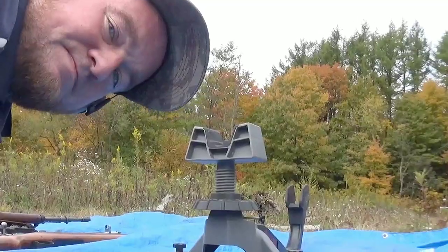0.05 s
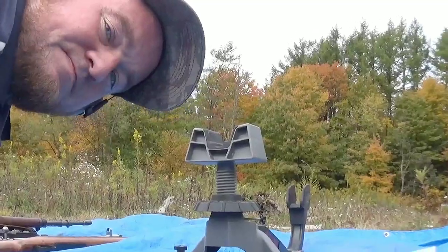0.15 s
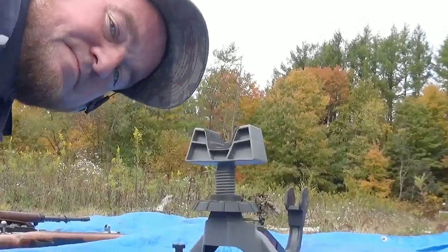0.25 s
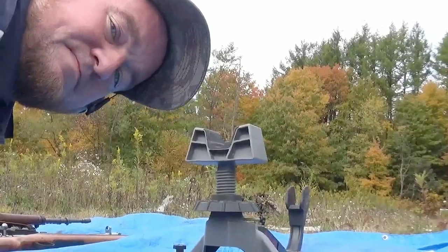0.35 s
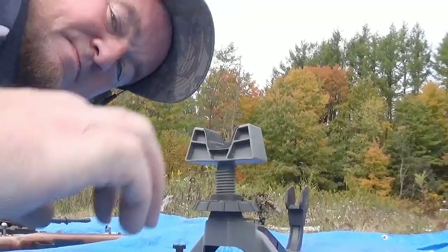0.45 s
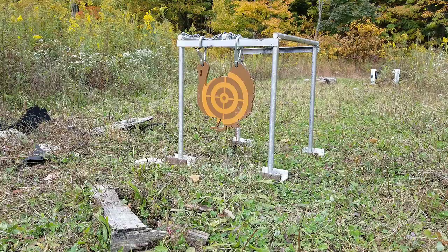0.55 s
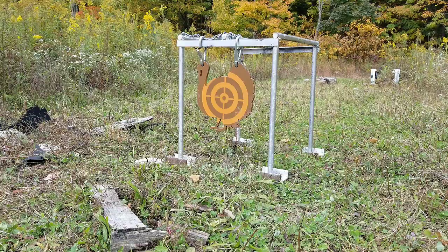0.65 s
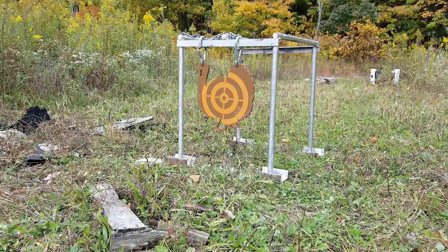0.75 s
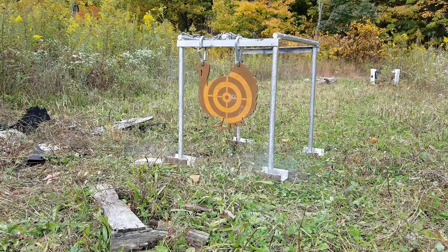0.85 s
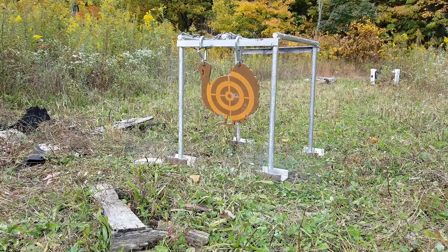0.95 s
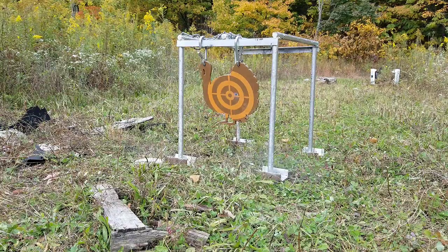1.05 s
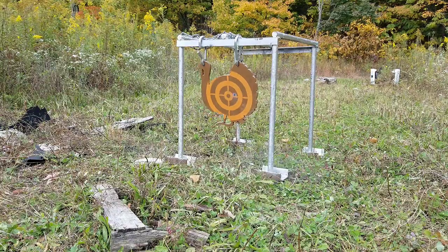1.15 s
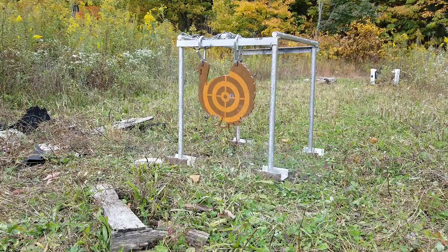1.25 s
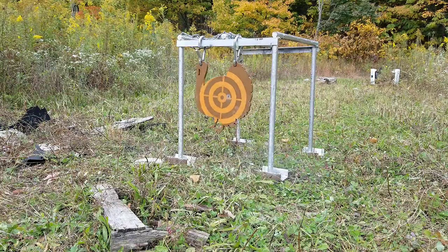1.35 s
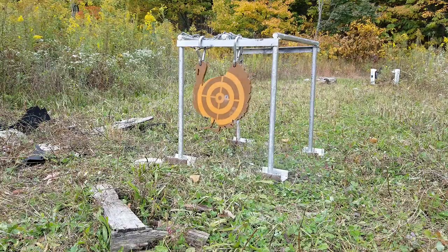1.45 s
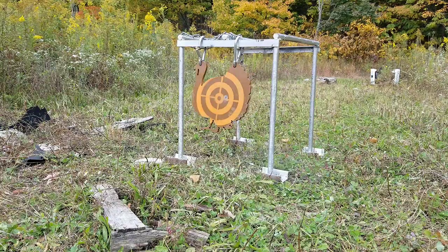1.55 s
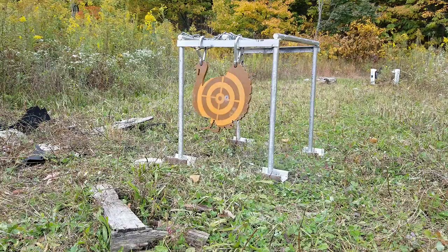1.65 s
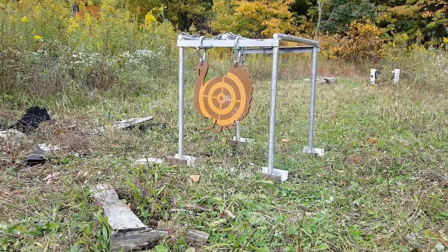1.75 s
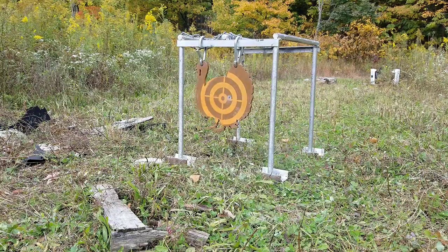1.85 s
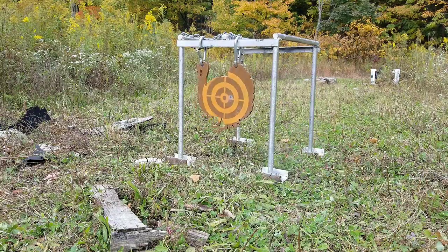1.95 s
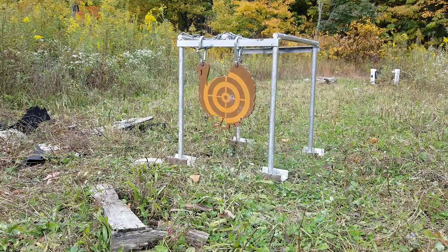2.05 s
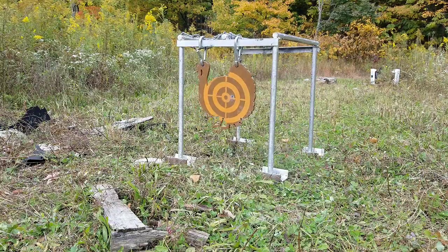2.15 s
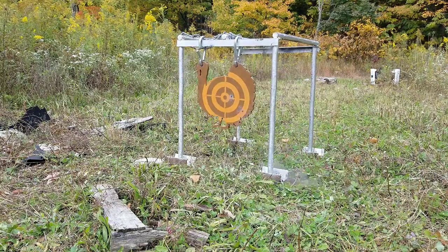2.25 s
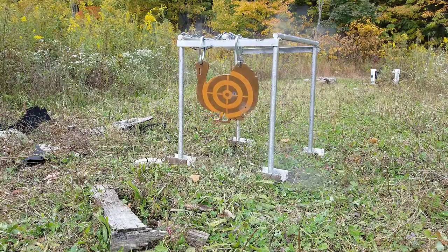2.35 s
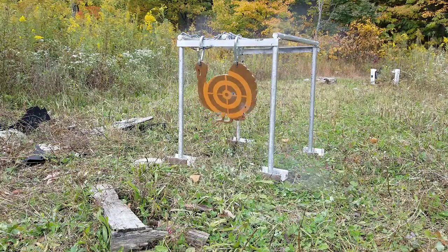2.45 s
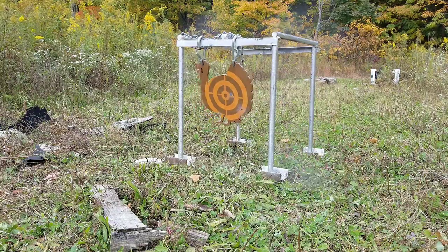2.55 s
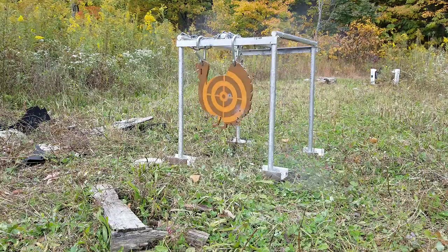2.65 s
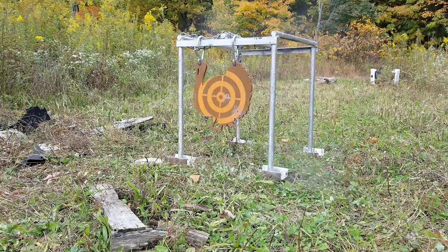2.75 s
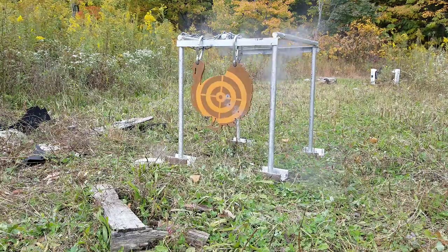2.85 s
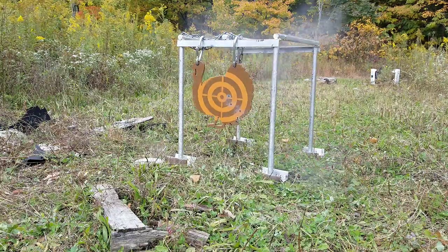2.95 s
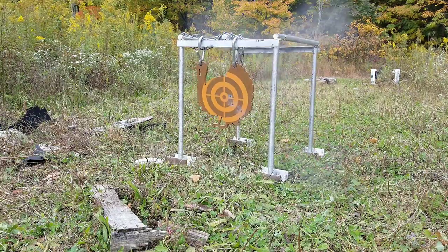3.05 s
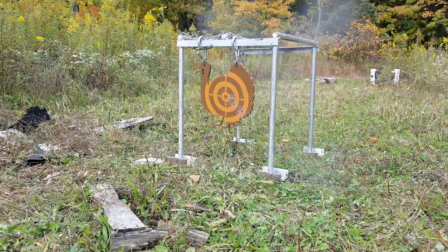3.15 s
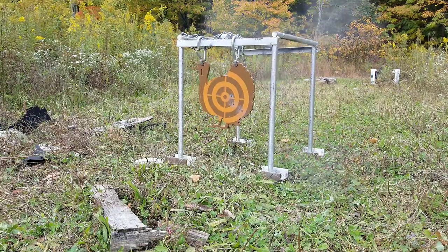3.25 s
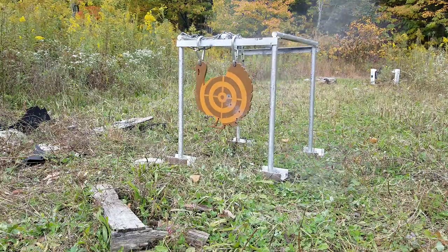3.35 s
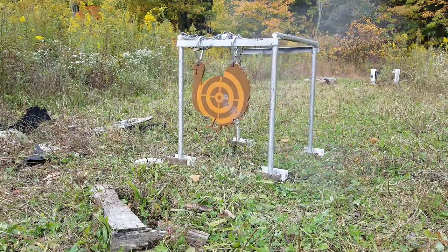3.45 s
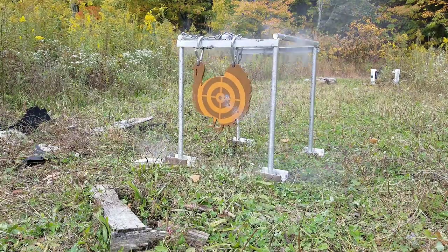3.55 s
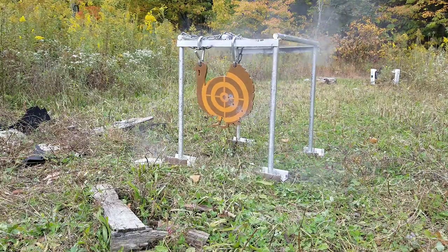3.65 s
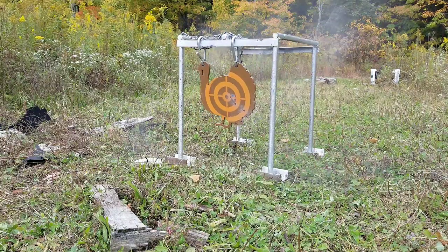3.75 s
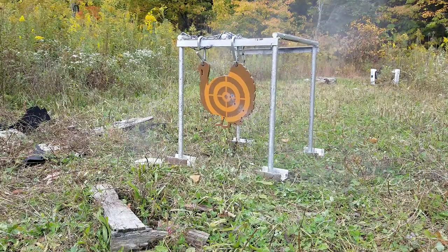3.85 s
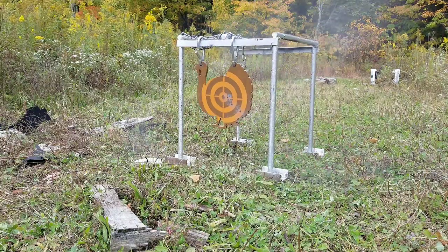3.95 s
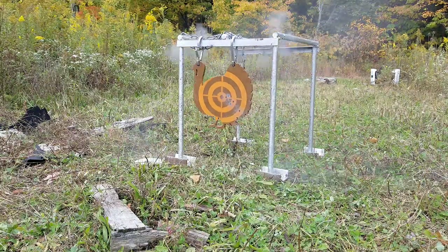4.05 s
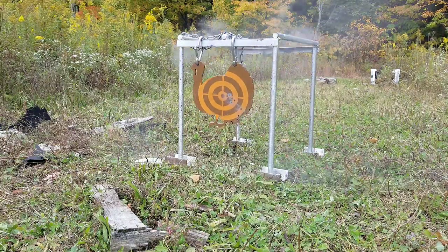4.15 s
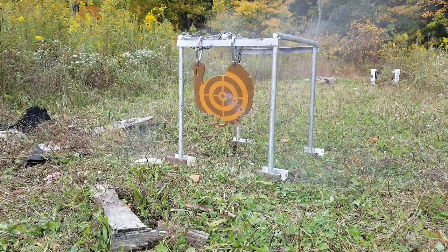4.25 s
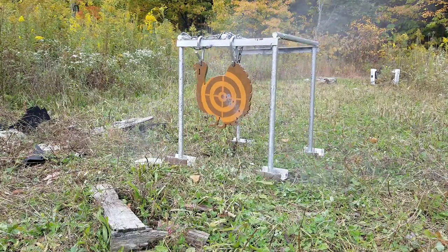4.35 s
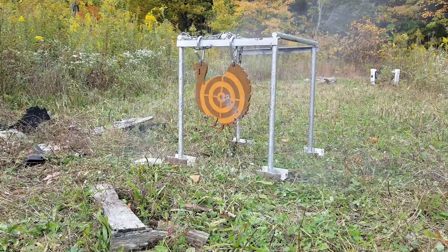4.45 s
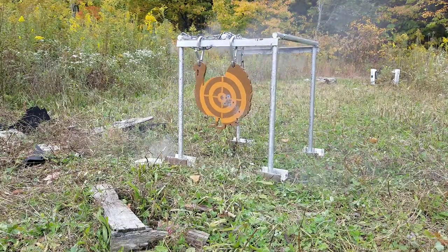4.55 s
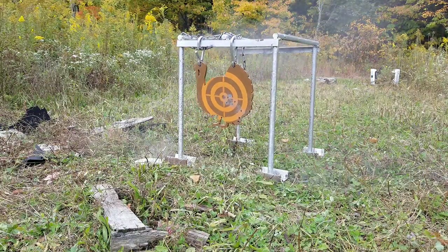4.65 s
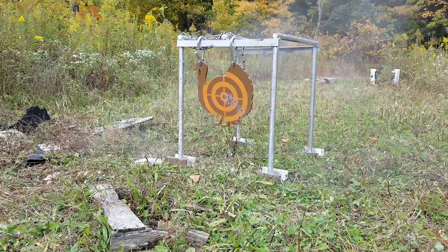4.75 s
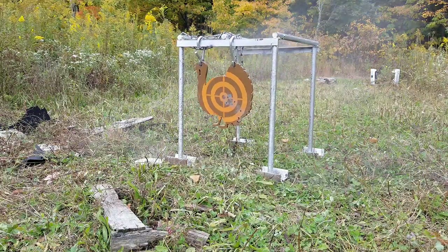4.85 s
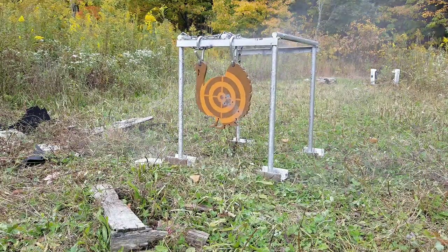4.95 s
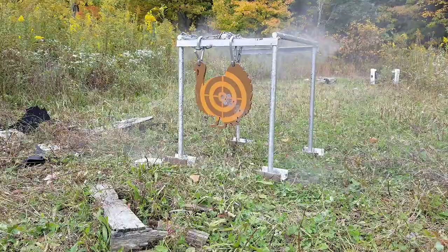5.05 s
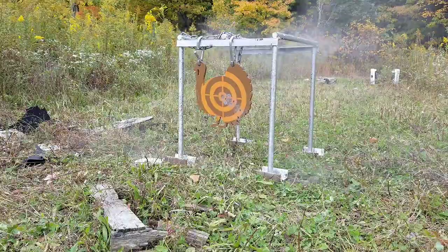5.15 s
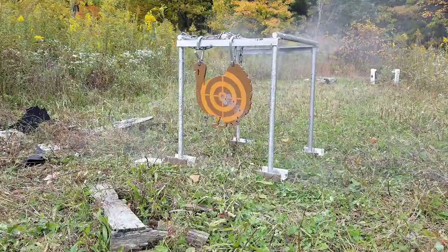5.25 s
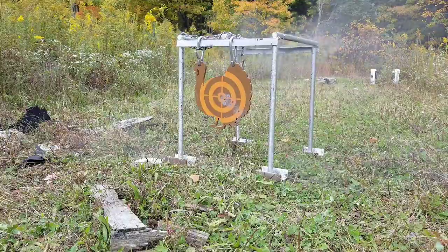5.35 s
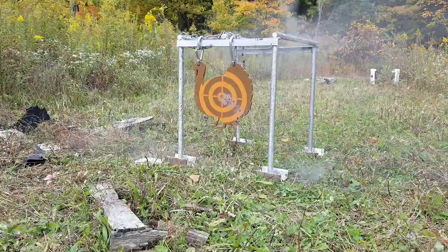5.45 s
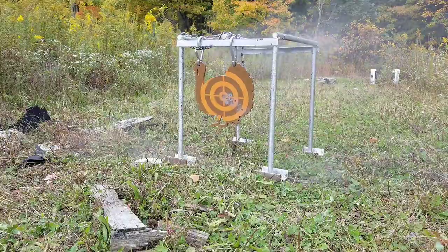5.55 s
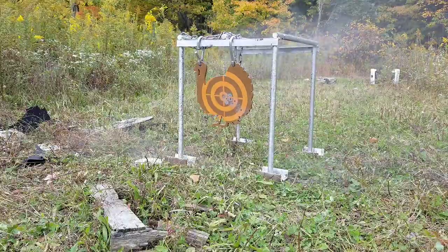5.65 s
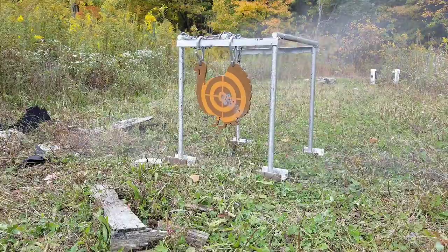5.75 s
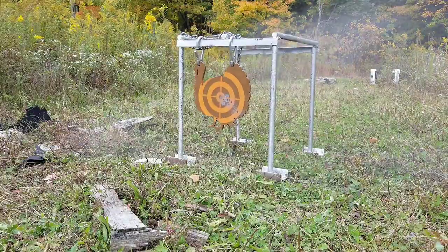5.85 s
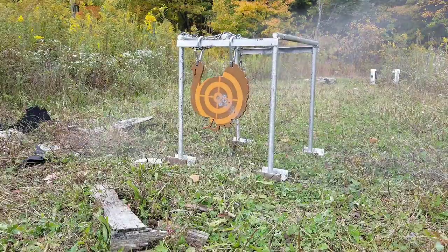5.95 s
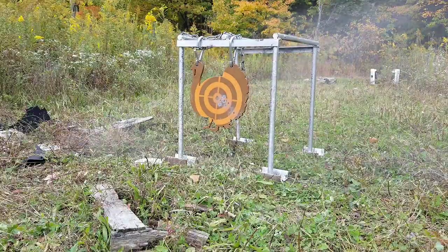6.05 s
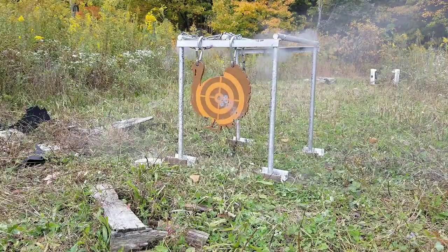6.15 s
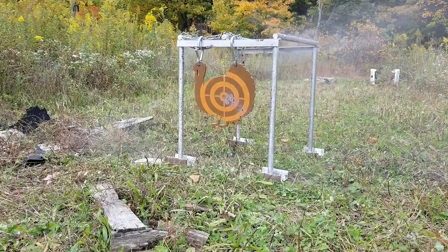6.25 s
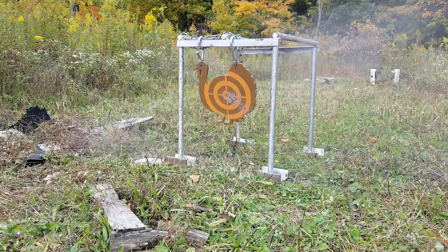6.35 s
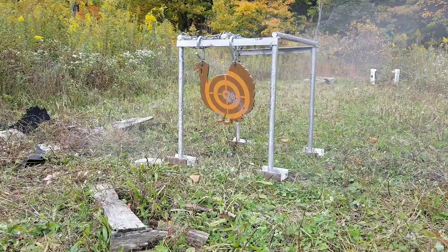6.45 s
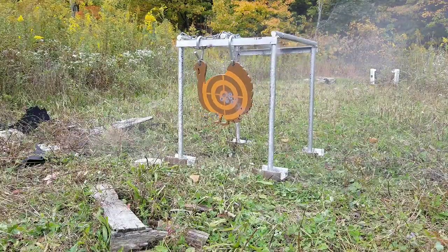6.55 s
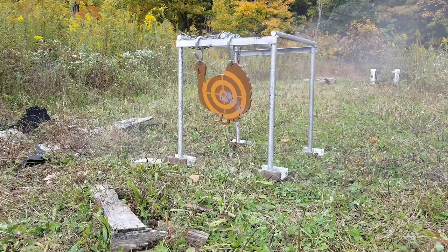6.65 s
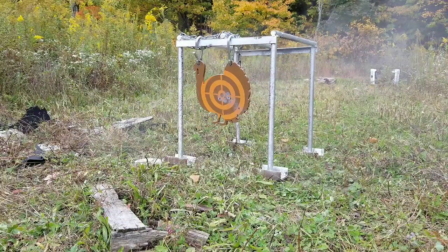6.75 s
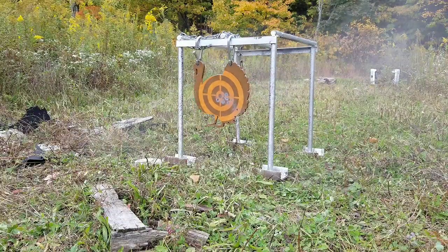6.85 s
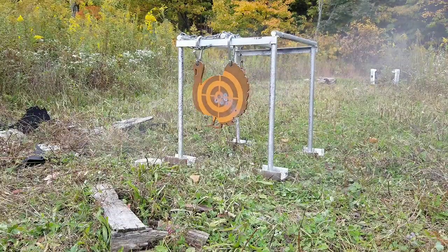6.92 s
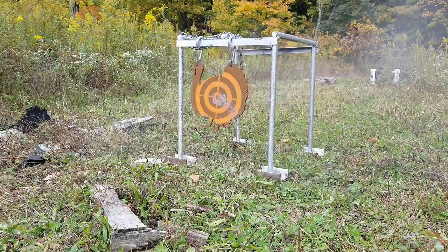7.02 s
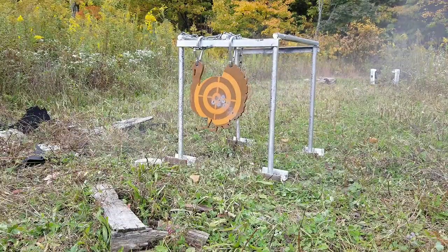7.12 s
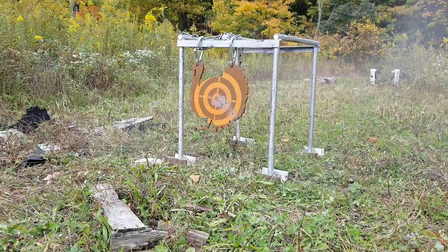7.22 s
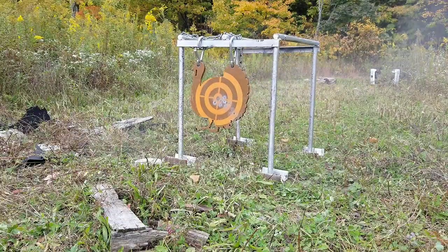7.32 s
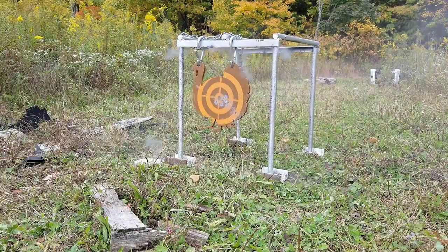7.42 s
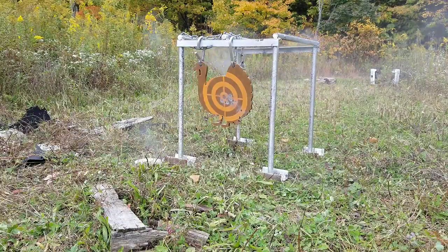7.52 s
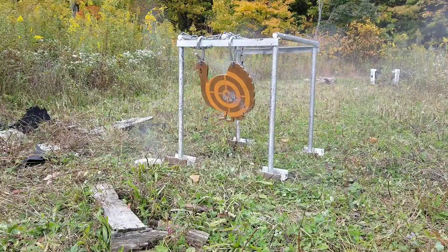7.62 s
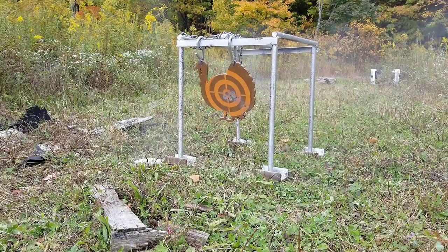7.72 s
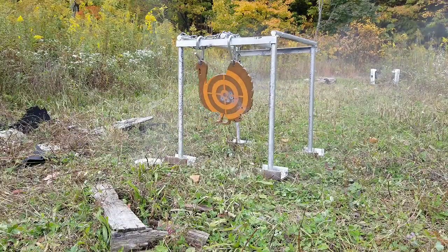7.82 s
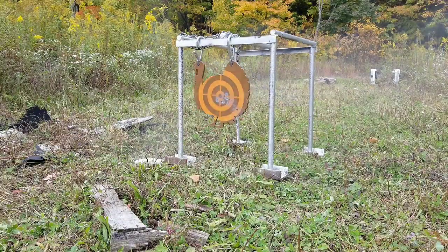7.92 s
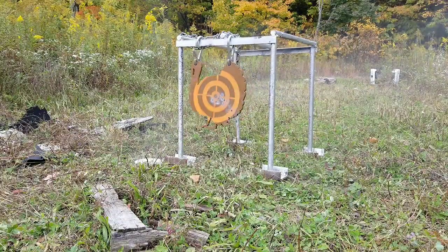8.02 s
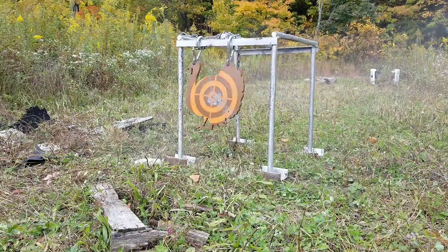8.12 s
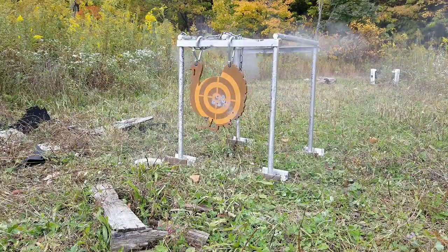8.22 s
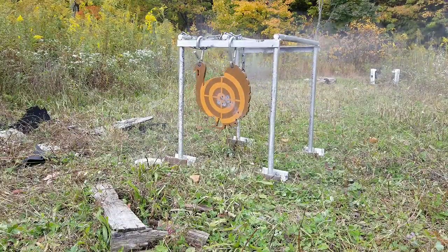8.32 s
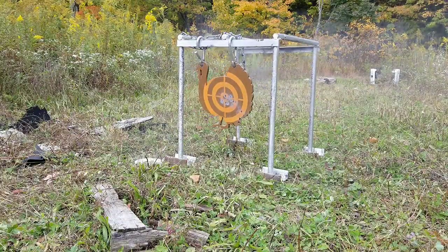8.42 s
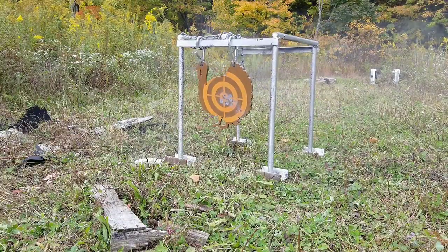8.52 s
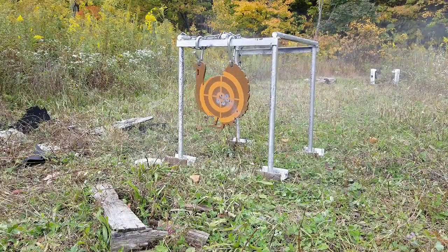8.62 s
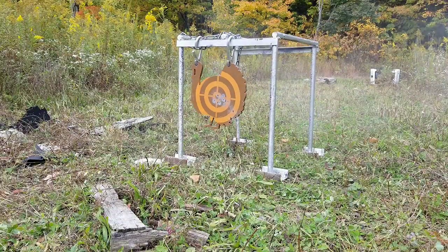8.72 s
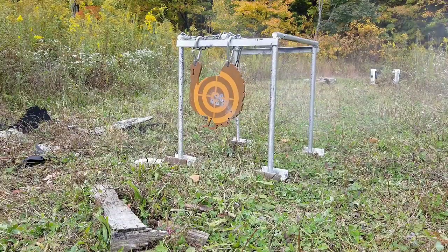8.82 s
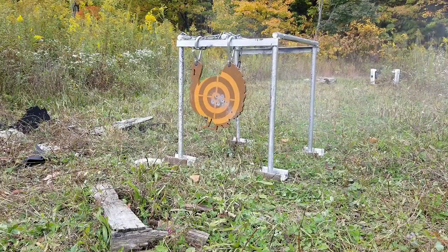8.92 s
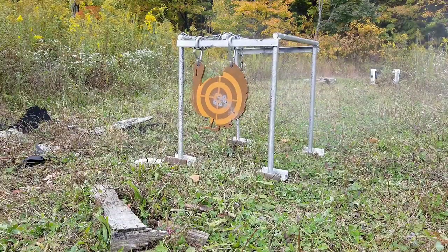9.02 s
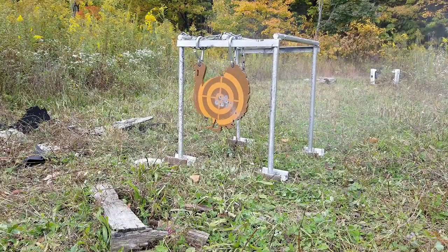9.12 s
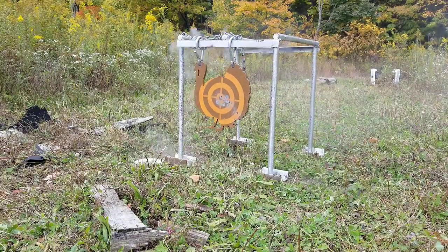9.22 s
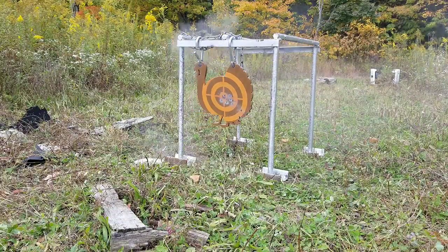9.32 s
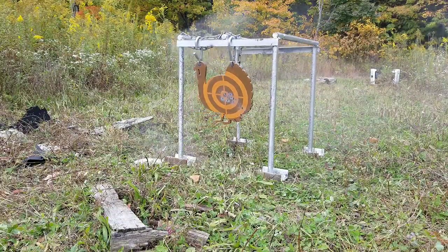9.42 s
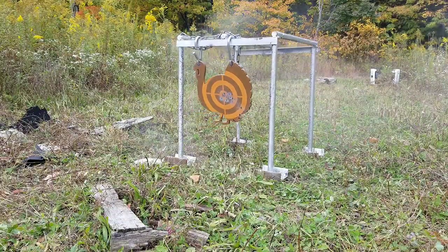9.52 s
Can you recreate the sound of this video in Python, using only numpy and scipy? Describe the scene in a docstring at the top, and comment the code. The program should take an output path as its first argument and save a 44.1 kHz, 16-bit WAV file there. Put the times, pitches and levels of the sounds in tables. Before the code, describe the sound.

Dull close handling clicks end abruptly; crickets chirp in open air for a moment. Then thirteen bullet strikes hit a hanging steel target close to a small stereo camera microphone, each a clipped crack and thud with spraying lead hiss and a bright, dissonant metallic clang that breaks off quickly. A diffuse gunshot report follows every blow and rumbles along the tree line, filling the gaps between hits.

```python
"""First a rifle rest is handled close to one camera: noise bursts round broad resonances click and scrape over air noise.
After a cut, a second camera stands in a meadow: gliding sines chirp as crickets over far insects and wind, both noise.
The gain control ducks these under the first shot. Each bullet cracks past, a shock offset pinning one port; the blow
thumps and splashes in fading noise, and decaying sine modes ring a hanging steel plate and hum in its frame.
The far muzzle report follows each blow, lumpy noise that rolls off the tree line."""
import sys
import numpy as np
from scipy import signal
from scipy.fft import rfft, irfft, next_fast_len
from scipy.io import wavfile
from scipy.ndimage import uniform_filter1d, map_coordinates

SR = 44100
rng = np.random.default_rng(int(sys.argv[2]) if len(sys.argv) > 2 else 0)


def store_pcm(level_fs):
    """Save levels as 16-bit WAV."""
    pcm = np.round(np.clip(level_fs, -1, 1) * 32767).astype(np.int16)
    wavfile.write(sys.argv[1], SR, np.atleast_2d(pcm).T)


N = 422478

# the cut between the cameras: first one ends t/s, second one begins t/s
CUT = (.5315, .557)
# natural frequencies of the steel plate, one for each row of PLATE: f/Hz
PLATE_HZ = [1860, 2431, 3639, 4328, 4710, 5165, 5706, 5997, 6172, 6589, 6756, 7076, 7714, 8293, 8425, 8608,
            9044, 9402, 9615, 10104, 10592, 11108, 11421, 12371, 13143, 13251, 14123, 14328, 14594, 14904,
            15305]
# plate modes: clang level/dB, clang t60/s, lasting ring level/dB, its t60/s before a random spread,
# slant of the wave pattern/rad, phase across/rad, phase upward/rad
PLATE = [(6.5, 0.22, -37, 1.3, 0.2, -1, 0.45), (12, 0.2, -21.5, 0.44, 0.25, -0.98, 0.42),
         (3.5, 0.4, -42.5, 1.6, 0.84, -0.58, 0.29), (18, 0.19, -41.5, 0.67, 0.9, 1, 0.29),
         (12.5, 0.26, -42.5, 0.66, 1, 1.4, -0.79), (9.5, 0.22, -35.5, 0.39, 0.09, -1.51, 0.88),
         (1.5, 0.21, -50, 0.94, 0.17, -0.81, -0.13), (4, 0.22, -39.5, 0.8, 1.7, -0.82, -0.51),
         (16, 0.28, -37, 0.49, 1.486, -0.44, 0.53), (13.5, 0.23, -37, 0.29, 0.52, -0.73, 1.5),
         (10, 0.19, -48.0, 1.4, 0.18, -0.0085, -0.78), (21.5, 0.21, -35.5, 0.83, 0.15, -1.1, 1.16),
         (-3, 0.23, -37.5, 0.62, 0.65, -1.04, 0.08), (2.5, 0.13, -36.5, 0.53, 0.86, -1.1, 0.088),
         (2.3, 0.21, -47, 0.51, 0.57, -1.1, 0.012), (11.5, 0.26, -31, 0.45, -0.03, 1.37, -1.4),
         (6, 0.043, -17.5, 0.32, 0.78, -1.8, -0.67), (18, 0.07, -25.5, 0.35, 0.05, 1, -1.41),
         (-1.2, 0.23, -48.5, 0.71, 1.11, -1.2, -1.55), (-3.1, 0.26, -56, 0.73, 1.01, 0.32, 0.9),
         (12, 0.2, -35.5, 0.72, 0.61, -0.14, 0.018), (4, 0.21, -32, 0.16, 0.68, -1.2, -1.3),
         (-5, 0.07, -0.65, 0.36, 1.21, -0.67, 0.72), (14.5, 0.19, -23.5, 0.41, 1.02, -0.63, 1.1),
         (1, 0.21, -29, 0.39, 0.81, 0.44, -0.84), (4, 0.16, -10.5, 0.46, 0.85, 0.51, -0.88),
         (17, 0.13, -29, 0.42, 0.99, 0.32, 0.98), (12, 0.077, 8, 0.25, 0.8, -1.4, -0.18),
         (13.5, 0.067, 11.5, 0.17, 0.6, -0.32, 1.19), (1.5, 0.16, 6.5, 0.27, 0.79, 0.43, -0.64),
         (6, 0.44, -10, 0.38, 0.96, 0.4, 0.36)]
LEAD_S, PIN_S = .0015, .0073  # crack to shock, and how long the shock pins the port


def amp(db):
    """Level as amplitude ratio: 20 dB for each factor of ten."""
    return 10 ** (np.asarray(db) / 20)


def unit(x):
    """Normalization to a root mean square of 1."""
    return x / np.sqrt(np.mean(x ** 2) + 1e-20)


def along(points, hz, axis=1):
    """Interpolation of one table column on a logarithmic frequency axis."""
    columns = np.transpose(points)
    return np.interp(np.log(hz + 1), np.log(columns[0] + 1), columns[axis])


def filtered(x, response):
    """Linear filtering: the spectrum is multiplied by a response of frequency."""
    m = next_fast_len(x.shape[-1] + SR // 4)
    spectrum = rfft(x, m) * response(np.fft.rfftfreq(m, 1 / SR))
    return irfft(spectrum, m)[..., :x.shape[-1]]


def noise(spectrum, alike, size=N):
    """Partial coherence: stereo noise of rms 1 whose channels correlate by alike."""
    a, b = filtered(rng.standard_normal((2, size)), lambda hz: amp(along(spectrum, hz)))
    turn = np.arccos(np.clip(alike, 0, 1)) / 2
    left = np.cos(turn) * a + np.sin(turn) * b
    right = np.cos(turn) * a - np.sin(turn) * b
    return unit(np.array([left, right]))


def dying(table, alike, seconds, longest=np.inf, patchy_db=0):
    """Frequency-dependent decay: noise of rms 1 in which each band fades at its own rate, in patches."""
    hz, t, z = signal.stft(noise(table, alike, size=round(seconds * SR)), SR, nperseg=256)
    t60 = np.minimum(along(table, hz, axis=2), longest)
    patches = uniform_filter1d(rng.standard_normal(z.shape[1:]), size=5, axis=0)
    patches = uniform_filter1d(patches, size=9, axis=1)
    decay_db = patchy_db * unit(patches) - 60 * t / t60[:, None]
    return signal.istft(z * amp(decay_db), SR, nperseg=256)[1]


def add(track, s, sound):
    """Superposition: a sound is mixed into the track at s seconds."""
    part = track[:, round(s * SR):][:, :sound.shape[1]]
    part += sound[:, :part.shape[1]]


def held_db(x, release):
    """Peak detection: a level that jumps up at once and falls by release dB a second."""
    fall = release * np.arange(N) / SR
    return np.maximum.accumulate(20 * np.log10(np.abs(x) + 1e-9) + fall, axis=-1) - fall


def handling():
    """Impact and friction: hard parts excite broad resonances, heard by a duller camera."""
    # air round the first camera: f/Hz, relative level per Hz/dB
    first_air = [(35, -41), (60, -7.5), (305, 2), (565, -1), (897, -2), (1090, -4.5), (3280, -4.5),
                 (5820, -6.5), (7250, 4), (10800, -19.5), (11500, -39.5), (15000, -69), (22000, -120)]
    # clicks and scrapes: t/s, level/dB before a common trim, f/Hz, t60/s
    contacts = [(0.053, -23, 2930, 0.025), (0.0731, -13, 1358, 0.027), (.107, -16.5, 1264, 0.015),
                (0.135, -25.5, 1470, 0.011), (.212, -18, 1988, 0.1), (0.2209, -10, 1355, 0.013),
                (0.225, -13, 5060, 0.031), (0.245, -20, 2330, 0.12), (.264, -9, 2380, .018),
                (0.294, -25, 7900, 0.0045), (0.308, -21, 3990, 0.1), (0.324, -17, 950, 0.033),
                (0.333, -2, 8600, 0.021), (0.3368, -10, 1330, 0.04), (.36, -23.5, 946, .04),
                (.405, -25.5, 3410, 0.12), (0.426, -24.5, 3400, 0.032)]
    # tick of the cut itself: same columns
    cut_tick = (.5285, -18, 3050, .01)
    out = amp(-44.5) * noise(first_air, alike=0.73)
    t = np.arange(SR // 10) / SR
    for s, db, hz, t60 in contacts + [cut_tick]:
        # 11 ms rise for a t60 of a tenth of a second; shorter sounds start far more sharply
        rise_s = 0.011 * (10 * t60) ** 1.5
        body = [(hz / 8, -22), (hz / 1.1, -6), (hz, 0), (hz * 1.2, -7), (hz * 3, -20), (hz * 8, -32)]
        shape = amp(-60 * t / t60) * (1 - np.exp(-t / max(rise_s, 1e-4)))
        burst = shape / shape.max() * noise(body, alike=0.67, size=len(t))
        add(out, s, amp(db - 9) * burst)
    return filtered(out, lambda hz: hz < 11200) * (np.arange(N) < CUT[0] * SR)


def crickets(out):
    """Frequency modulation: near crickets chirp in little arcs of pitch under a rounded envelope."""
    # singers: first chirp t/s, last t/s, chirps a second/Hz, top f/Hz, fall f/Hz, length/s,
    # left level/dB, right level/dB (both before a small random spread)
    singers = [(.5635, .86, 44.4, 6700, 700, .016, -41, -46),
               (.587, .86, 15.5, 7600, 300, .026, -42.5, -43.5),
               (.618, 9.6, 15.1, 6950, 400, .02, -41.5, -40.5),
               (.701, .86, 16.6, 14800, 900, .014, -55, -54.5)]
    for first, last, rate, hz, fall_hz, length, *db in singers:
        u = np.linspace(0, 1, round(length * SR))
        pitch = hz - fall_hz * ((u - .35) / .65) ** 2
        chirp = np.sin(2 * np.pi * np.cumsum(pitch) / SR) * np.sin(np.pi * u) ** 0.64
        for s in np.arange(first, last, 1 / rate):
            add(out, s, amp(rng.normal(0, 1.4) + np.array(db)[:, None]) * chirp)


def wind():
    """Turbulence at the microphone ports: low noise whose level follows the gusts."""
    # gusts: t/s, level/dB
    gusts = [(.55, -43), (0.86, -44.5), (1.5, -35.5), (2.1, -40), (3.3, -31), (4, -34.5), (5.9, -27.5),
             (6.4, -34.5), (7.2, -30.5), (7.6, -26), (8.2, -37.5), (8.8, -35.5), (9.6, -26)]
    # spectrum of the rumble: f/Hz, relative level per Hz/dB
    rumble = [(20, -11), (60, 1.5), (120, -11.5), (300, -26.5), (600, -57), (2000, -83.5)]
    gust_db = np.interp(np.arange(N) / SR, *np.transpose(gusts))
    return amp(gust_db) * noise(rumble, alike=0.33)


def body_knocks(out):
    """Step response: a knock shifts the membranes for a while; the later bass cut makes it a thud."""
    # small knocks on the camera body: t/s, level/dB
    knocks = [(1.742, -9), (9.1061, -10.5), (9.131, -11.5)]
    for s, db in knocks:
        add(out, s, -amp(db) * np.exp(-np.arange(SR // 5) / (.03 * SR)) * np.ones((2, 1)))


def meadow():
    """Incoherent sum: near crickets over a far insect chorus, wind and small knocks."""
    # far insects: f/Hz, relative level per Hz/dB
    far_insects = [(300, -22.5), (800, -19), (1500, -24.5), (5000, -27), (6000, -5), (7400, 6), (8400, -10),
                   (9200, -34), (11000, -25.5), (13500, -20.5), (16000, -12.5)]
    out = amp(-46) * noise(far_insects, alike=.1)
    crickets(out)
    out += wind()
    body_knocks(out)
    return out * (np.arange(N) > CUT[1] * SR)


def shots():
    """Time of flight: crack and thump first, the plate a few ms later, then the muzzle report."""
    # bullets: t/s, blow level/dB, muzzle report level/dB, thump level/dB relative to the blow,
    # landing right of the group's middle/cm, above it/cm, mean time until the clang breaks off/s
    bullets = [(0.8604, 39.02, 3.5, 23, 0.7, -3.5, 0.22), (2.3182, 33.5, 3.7, 15, -3, 3.5, 0.16),
               (2.8608, 37.8, 3.0, 20.0, 1.93, 2.5, 0.36), (3.5744, 37.5, 3.7, 20, 6.0, -3, 0.18),
               (4.0904, 37.26, 4, 16, 1.4, 6.5, 0.22), (4.5662, 37.55, 4.1, 19.0, 6.5, -1.2, 0.2),
               (5.0384, 40.47, 4.5, 21.0, -6, 5.5, 0.29), (5.48, 40.76, 4.5, 19, 1.0, -4, 0.25),
               (6.2344, 39.16, 5.0, 19.0, 2.74, 7, 0.28), (6.6479, 36.57, 5.9, 15.0, -0.9, -2.3, 0.22),
               (7.5146, 37.2, 5.5, 17.0, 6.5, 6.5, 0.26), (8.2196, 37.57, 6.1, 15.0, -6.5, 1.7, 0.21),
               (9.3063, 37.47, 7.2, 15.0, 4.5, 6.5, 0.2)]
    out, t = np.zeros((2, N)), np.arange(next_fast_len(SR)) / SR
    pinned, shock = shock_wave(t)
    arrival = 1 / (1 + np.exp(-(t - .008) / 0.0012))  # the plate's sound has further to travel
    for s, blow_db, report_db, thump_db, right_cm, up_cm, break_s in bullets:
        drive_db = landing_db(right_cm, up_cm)
        sound = ring(drive_db, break_s, t)
        add(sound, 0, rattle(t[:SR // 5]))
        sound *= arrival
        add(sound, 0, splash())
        add(sound, 0, thump(thump_db))
        sound *= amp([[2.5], [-2.5]]) * np.minimum(t / LEAD_S, 1) ** 3
        sound[1] = np.where(pinned, .12, 1) * sound[1] + amp(18) * shock
        sound[0] += amp(17.0) * uniform_filter1d(shock, 40)  # the left port feels a softer push
        add(out, s - LEAD_S, amp(blow_db) * sound)
        add(out, s + PIN_S, amp(blow_db) * hum(drive_db))
        add(out, s + .14, amp(report_db) * report())
    return out


def shock_wave(t):
    """Membrane overload: brief suction, a pinned offset, then two exponentials as it settles."""
    pinned = (t >= LEAD_S) & (t < LEAD_S + PIN_S)
    after = np.maximum(t - LEAD_S - PIN_S, 0)
    suction = (t > LEAD_S - .0003) & (t < LEAD_S)
    settling = (.5 * np.exp(-after / 0.0083) - 0.8 * np.exp(-after / 0.0037)) * (after > 0)
    return pinned, pinned - 1.1 * suction + settling


def splash():
    """Fragmentation: lead hisses off the plate as patchy noise, each band with its own decay."""
    # lead fragments: f/Hz, relative level per Hz/dB, t60/s before the cap below
    fragments = [(300, -15.5, 0.17), (945, 3.5, 0.12), (2784, 0, 0.17), (5440, -5, 0.19), (7600, -15, 0.25),
                 (9000, -19.5, 0.2), (12900, -2.5, 0.22), (16000, -13.5, 0.17)]
    return amp(10) * dying(fragments, 0.89, seconds=.4, longest=0.23, patchy_db=2.5)


def thump(thump_db):
    """Volume displacement: air pushed by the blow, low noise that is stronger on the left."""
    # pushed air: f/Hz, relative level per Hz/dB, t60/s
    pushed_air = [(30, -3, 0.13), (68.6, -1.5, .14), (151, -4, 0.076), (350, -5.5, 0.12),
                  (676, -10.5, 0.049), (2000, -25.5, 0.061)]
    return amp(thump_db + np.array([[-3], [-8]])) * dying(pushed_air, 0.59, seconds=0.58)


def landing_db(right_cm, up_cm):
    """Modal excitation: a blow drives each tone as far as its standing wave moves at the landing spot."""
    # bending waves in the steel: at this f/Hz, this wavelength/cm
    bending = (6000, 4 * np.pi)
    slant, across, upward = np.transpose(PLATE)[4:]
    # the wavelength shrinks with the root of the frequency
    per_cm = 2 * np.pi / bending[1] * np.sqrt(np.array(PLATE_HZ) / bending[0])
    swing_across = np.cos(per_cm * np.cos(slant) * right_cm + across)
    swing_up = np.cos(per_cm * np.sin(slant) * up_cm + upward)
    # a blow right on a node line still gives -19 dB
    return 10 * np.log10((swing_across * swing_up) ** 2 + amp(-19) ** 2)


def ring(drive_db, break_s, t):
    """Damped modes: the decay spread, the beats and the aim at the ports vary by tone and blow."""
    db, t60, late_db, late_t60 = np.transpose(PLATE)[:4, :, None]
    aim, break_spread, late_spread = rng.uniform(-0.92, 1, size=(3, len(PLATE), 1))
    depth, beat_hz, phase, start = rng.uniform(size=(4, 2, len(PLATE), 1))
    beats = 1 + .5 * depth * np.sin(2 * np.pi * ((2 + 12 * beat_hz) * t + phase))
    # the clang breaks off ever faster
    break_db = 14 * (t / (break_s + .02 * break_spread)) ** 5
    clang = amp(db - 60 * t / t60 - break_db)
    lasting = amp(late_db - 60 * t / (late_t60 * (1 + 0.37 * late_spread)))
    # each tone flutters: 48 random levels over its second
    knots = rng.standard_normal((2, len(PLATE), 48))
    beats = beats * amp(2.5 * signal.resample(knots, len(t), axis=2))
    # the ports hear a tone about a quarter cycle apart
    apart = np.sign(start[1] - .5) * (.17 + .12 * start[0])
    start = start[0] + [[[0]], [[1]]] * apart
    side = np.pi / 4 + .5 * aim
    tones = np.sin(2 * np.pi * (np.array(PLATE_HZ)[:, None] * t + start))
    pan = [np.cos(side), np.sin(side)]
    return (amp(drive_db[:, None]) * (clang + lasting) * beats * tones * pan).sum(1)


def rattle(t, count=120):
    """Modal density: hooks, chain and frame pipes add many brief partials, new at each blow."""
    hz, size, life, start = rng.uniform(size=(4, 2, count, 1))
    hz = 450 * 34 ** hz  # evenly spread in log frequency
    level = amp(-0.5 - 20 * size - 60 * t / (0.084 + 0.074 * life))
    return (level * np.sin(2 * np.pi * (hz * t + start))).sum(1)


def hum(drive_db):
    """Structural coupling: plate tones feed the frame's short low note and long faint ones."""
    # frame tones: f/Hz, level/dB before the plate's drive, t60/s
    frame_tones = [(430, -12, .15), (2431, -50, 1.6), (3639, -54, 1.7), (4345, -53, 1.4), (4880, -52, 1.4),
                   (6172, -53, 1.3)]
    hz, db, t60 = np.transpose(frame_tones)[:, :, None]
    t = np.arange(SR * 3 // 2) / SR
    size, start = rng.standard_normal((2, 2, len(frame_tones), 1))
    waver_db = 5 * np.sin(2 * np.pi * (3 * t + start))  # as the plate swings
    # the hooks pass on the drive of the plate tones nearby, raised by 7 dB
    fed_db = 7 + np.interp(hz, PLATE_HZ, drive_db) + 1.7 * size + waver_db
    return (amp(db + fed_db - 60 * t / t60) * np.sin(2 * np.pi * hz * t + 3 * start)).sum(1)


def report():
    """Diffuse reflection: the report rolls in off the trees in lumps, with one sharp muzzle crack."""
    # tree line: f/Hz, relative level per Hz/dB, t60/s
    tree_roll = [(60, -17, 1.3), (313, -5.5, 1.4), (860, -1.5, 0.93), (1750, 4.5, 1.125),
                 (2700, -3.5, 1.13), (4960, -8.5, 1), (7600, -8.5, 0.75), (16000, -50, 0.28)]
    # long faint tail of the report: same columns
    faint_tail = [(203.7, -14, 1.8), (700, -3, 2.6), (1400, 1, 2.4), (2200, -6, 1.8), (4000, -25, 1)]
    roll = dying(tree_roll, 0.062, seconds=1.6, patchy_db=2.5)
    roll = roll + amp(-18) * dying(faint_tail, .1, seconds=1.6)
    age = np.arange(roll.shape[1]) / SR
    fast, slow = rng.standard_normal((2, 100))
    lumps_db = .7 * map_coordinates(fast, [age * 55]) + .8 * map_coordinates(slow, [age * 14])
    crack = 0.45 * np.exp(-((age - .066) / .006) ** 2)  # the muzzle crack
    return amp(lumps_db + np.array([[2.5], [-2.5]])) * (1 - np.exp(-age / 0.039) + crack) * roll


def scene():
    """Superposition of the handling, the meadow and the shots."""
    return handling() + meadow() + shots()


def record(dry):
    """Dynamic compression: slow gain control, a fast limiter for each port, bass cut and band limit."""
    slow_db = np.clip(-held_db(np.abs(dry).max(0), release=1), -38, 0)
    x = dry * amp(slow_db)
    over = amp(held_db(x, release=1100) + 6.0)
    x = x / (1 + over ** 1.696) ** (1 / 1.936)
    x = signal.sosfilt(signal.butter(2, 75, "highpass", fs=SR, output="sos"), x)
    # the microphone fades near its top: f/Hz, level/dB
    capsule = [(12500, 0), (14500, -2), (15700, -6)]
    return filtered(np.clip(x, -1, 1), lambda hz: amp(along(capsule, hz)) * (hz < 15700))


dry = scene()
out = record(dry)
store_pcm(out)
```